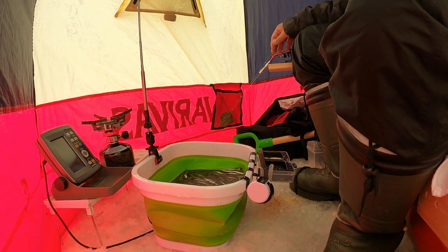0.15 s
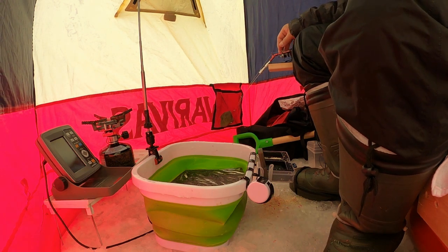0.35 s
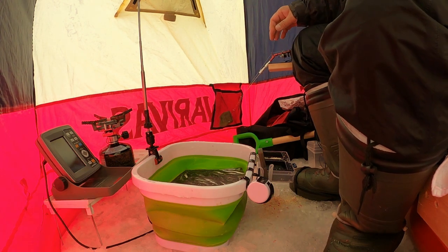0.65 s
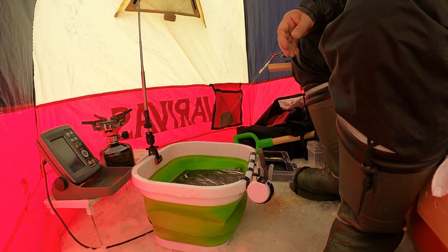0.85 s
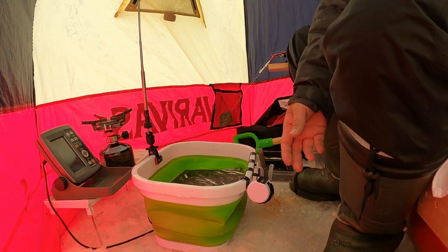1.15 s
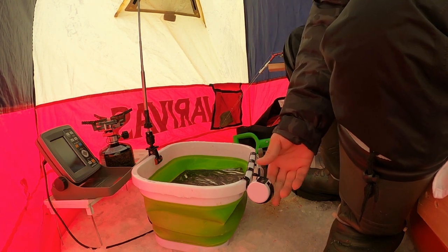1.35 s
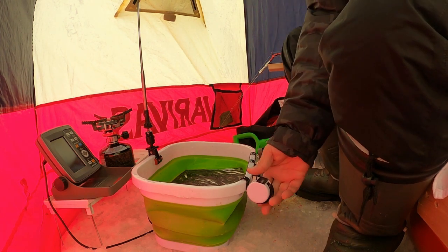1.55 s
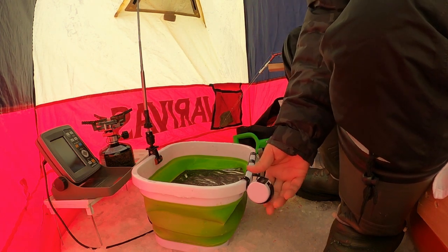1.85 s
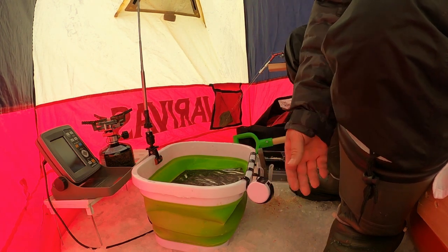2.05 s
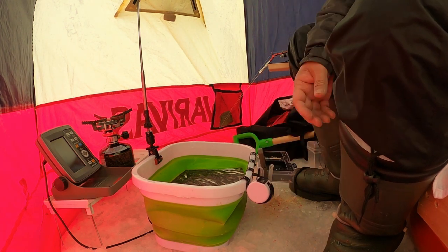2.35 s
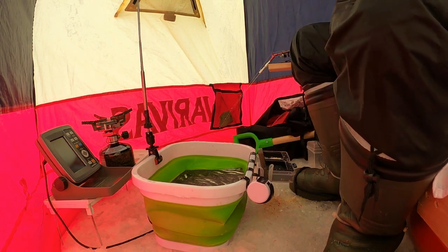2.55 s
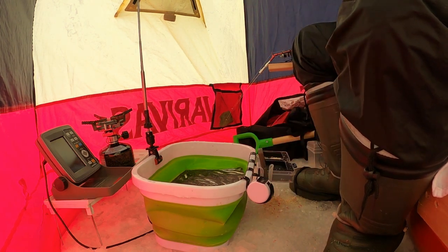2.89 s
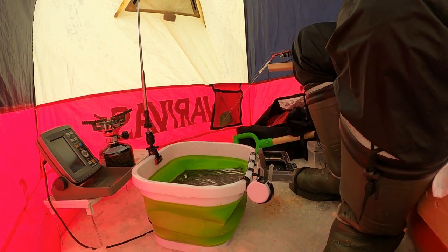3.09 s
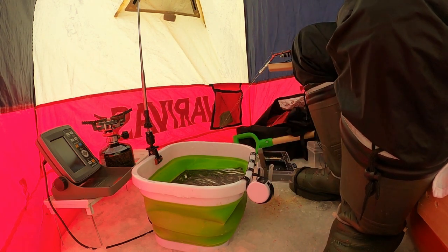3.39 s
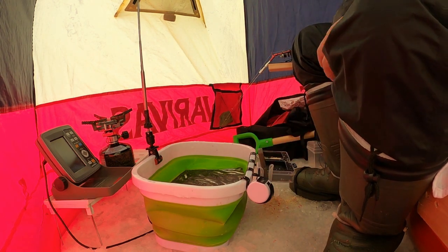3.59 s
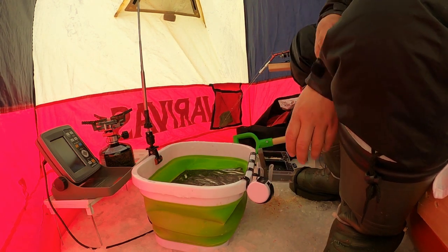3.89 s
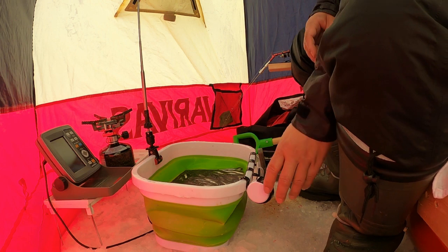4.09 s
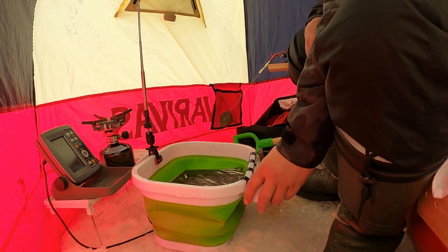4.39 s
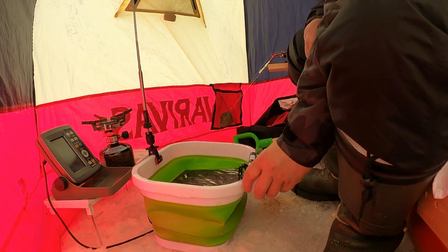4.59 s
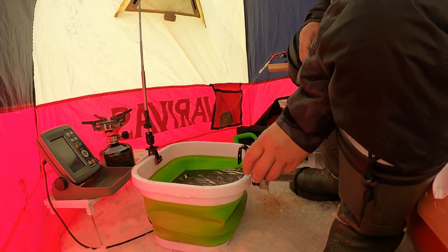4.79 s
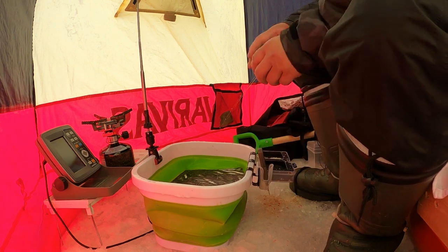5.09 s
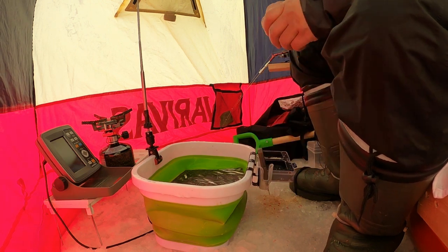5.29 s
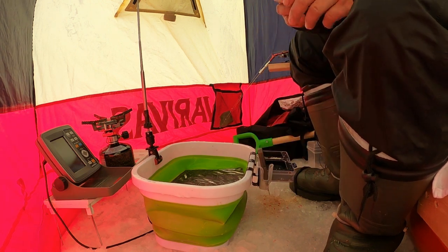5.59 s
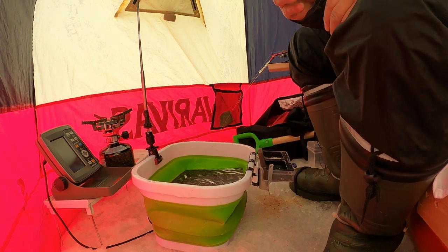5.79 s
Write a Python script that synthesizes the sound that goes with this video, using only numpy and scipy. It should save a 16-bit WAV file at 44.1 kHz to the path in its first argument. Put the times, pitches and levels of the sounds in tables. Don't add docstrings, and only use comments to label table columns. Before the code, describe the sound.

Nylon sleeves swish close by while a small reel stutters in two short bursts, with sharp plastic clicks and soft boot thuds inside a tent.

```python
import sys
import numpy as np
from scipy import signal
from scipy.fft import rfft, irfft
from scipy.io import wavfile
from scipy.ndimage import uniform_filter1d

SR = 44100
rng = np.random.default_rng(int(sys.argv[2]) if len(sys.argv) > 2 else 0)


def unload_audio(sound):
    columns = np.transpose(np.atleast_2d(sound))
    steps = np.round(np.clip(columns, -1, 1) * 32767)
    wavfile.write(sys.argv[1], SR, steps.astype(np.int16))


def field_ratio(decibels):
    return 10 ** (np.asarray(decibels, dtype=float) / 20)


N = 261954


def evened(x):
    return x / np.sqrt(np.mean(abs(x) ** 2) + 1e-20)


def read(points, hz):
    f, value = np.transpose(points)
    return np.interp(np.log(hz + 1), np.log(f + 1), value)


def add(mix, s, sound):
    part = mix[round(s * SR):][:len(sound)]
    part += sound[:len(part)]


def resonate(x, hz, width_hz):
    turn = np.exp(2j * np.pi * np.cumsum(hz * np.ones(len(x))) / SR)
    r = np.exp(-np.pi * width_hz / SR)
    smooth = signal.lfilter([1 - r], [1, -r], x / turn)
    return 2 * (turn * smooth).real


# (frequency [Hz], difference [dB])
BALANCE_DB = [(60, 1), (110, 1), (200, -0.5), (380, 0.0), (700, -2.5), (1290, 0.5), (2380, 2.5),
              (4400, 3.5), (8120, 3.5), (15000, -6)]
LAG_S = 5e-5


def ports(a, b, same, hz):
    c = np.clip(read(same, hz), 0, 1)
    side = field_ratio(read(BALANCE_DB, hz) / 2)
    left = a.T * side * np.exp(-2j * np.pi * hz * LAG_S)
    right = (c * a.T + np.sqrt(1 - c ** 2) * b.T) / side
    return np.array([left.T, right.T])


HOP = 128
HZ = np.fft.rfftfreq(4 * HOP, 1 / SR)


def band(shape, lo_hz, hi_hz):
    gain = field_ratio(read(shape, HZ))
    inside = (HZ >= lo_hz) & (HZ < hi_hz)
    return (gain / np.sqrt(np.sum(gain[inside] ** 2) / len(HZ)))[:, None]


def shaped(drive, gain, same):
    z = signal.stft(drive, nperseg=4 * HOP, noverlap=3 * HOP)[2]
    pair = ports(z[0] * gain, z[1] * gain, same, HZ)
    return signal.istft(pair, nperseg=4 * HOP, noverlap=3 * HOP)[1][:, :N]


# (frequency [Hz], density [dB per Hz])
AIR = [(12, -14), (20, -1), (44, -2), (103, -23), (169, -13), (460, -26), (780, -30), (1220, -22),
       (1650, -23), (2370, -43), (7590, -26), (9750, -38), (12200, -41), (13200, -41), (15200, -49)]
# (frequency [Hz], likeness [-])
AIR_SAME = [(60, 0.92), (180, -1.26), (550, -1.65), (1650, 0.87), (4970, -0.96), (15000, 0.28)]


def air(level_db=-67):
    return field_ratio(level_db) * shaped(rng.standard_normal((2, N)), band(AIR, 1000, 9000), AIR_SAME)


def hump(t, s, rise_s, fall_s, rise_shape, fall_shape):
    late = t - s[:, None]
    u = np.clip(np.where(late < 0, -late / rise_s[:, None], late / fall_s[:, None]), 0, 1)
    return abs(np.cos(np.pi * u / 2)) ** (2 * np.where(late < 0, rise_shape, fall_shape))


# (fastest moment [s], speed-up [s], slow-down [s], rubbing [dB], sheen [dB])
STROKES = [(.06, 0.21, 0.079, -50, 1.5), (.66, .14, 0.13, -65, -6), (.86, .14, 0.76, -42.5, 7),
           (1.2, .3, .42, -37.5, -.5), (1.57, 0.13, 0.088, -43, -5.5), (1.76, 0.28, 0.12, -49, -2),
           (1.93, 0.065, .11, -51, -9), (2.181, .21, 0.43, -42, -1.5), (2.6, 0.39, 0.32, -41, 2.5),
           (2.79, 0.21, .19, -47.5, -10), (3.07, .26, .24, -51.5, 1), (3.35, 0.18, 0.16, -52, 0),
           (3.6, 0.2, 0.27, -38.5, 1.5), (4.05, .42, 0.24, -35, 0), (4.26, 0.2, 0.26, -36.5, -3),
           (4.48, 0.17, 0.14, -41.5, -5.5), (4.65, 0.082, .22, -56.5, -2), (5.0, .19, .15, -41.5, -4),
           (5.11, .15, .25, -39, 2), (5.3, 0.2, 0.3, -45, 0), (5.64, 0.25, 0.21, -44, -2.5),
           (5.81, 0.14, 0.11, -43, 0), (5.95, 0.085, .1, -50.5, 0)]
# (time [s], length [s], folds [dB], sway [dB])
SHIFTS = [(.88, 0.096, -67, -57), (1.1, .13, -56, -56), (1.23, .17, -50, -45), (1.357, 0.18, -55, -51),
          (1.51, .18, -60, -46), (1.864, 0.084, -63, -55.5), (2.647, .2, -56, -57), (2.873, 0.29, -59, -53),
          (3.21, .2, -69, -65), (3.585, 0.23, -53.5, -65), (3.82, 0.23, -49.5, -55.5),
          (3.94, 0.22, -49.5, -60), (4.117, 0.26, -49, -49), (4.346, 0.37, -56, -60),
          (5.034, 0.18, -54, -57), (5.29, 0.27, -56, -56), (5.41, .12, -55, -60), (4.67, .14, -62, -62),
          (5.62, 0.11, -64.5, -59.5), (5.84, 0.22, -55, -67), (5.905, .1, -55, -52)]
RISE_SHAPE, FALL_SHAPE = 1.234, 1.08
REST_DB, REST_SHEEN_DB = -72.5, 10.5
SHEEN_PER_DB = 0.06
FOLDS_DB, FOLDS_PER_DB = -63, 0.9
SWAY_DB, SWAY_PER_DB = -64.5, 0.13


def motion(t):
    s, rise_s, fall_s, db, sheen_db = np.transpose(STROKES)
    each = hump(t, s, rise_s, fall_s, RISE_SHAPE, FALL_SHAPE) * field_ratio(2 * db)[:, None]
    rest = field_ratio(2 * REST_DB)
    power = each.sum(0) + rest
    rub_db = 10 * np.log10(power)
    lead_db = rub_db + 42
    bright_db = (sheen_db @ each + REST_SHEEN_DB * rest) / power + SHEEN_PER_DB * lead_db
    s, length, folds_db, sway_db = np.transpose(SHIFTS)
    shift = hump(t, s, length / 2, length / 2, 1, 1)
    folds = np.sqrt(field_ratio(2 * folds_db) @ shift + field_ratio(2 * (FOLDS_DB + FOLDS_PER_DB * lead_db)))
    sway = np.sqrt(field_ratio(2 * sway_db) @ shift + field_ratio(2 * (SWAY_DB + SWAY_PER_DB * lead_db)))
    return rub_db, bright_db, folds, sway


# (frequency [Hz], density [dB per Hz])
NYLON = [(410, -72), (700, -67), (840, -13.5), (1060, -2.5), (1590, -4), (2200, -3), (2800, -2.5),
         (4870, -5.5), (7540, -7), (8800, -12.5), (10400, -22.5), (12300, -23.5), (13200, -32.5),
         (15200, -37), (15700, -60)]
# (frequency [Hz], density [dB per Hz])
FOLDS = [(150, -39), (280, 1.5), (500, 3.5), (650, 2.5), (800, -8.5), (1000, -24)]
# (frequency [Hz], density [dB per Hz])
SWAY = [(20, -65), (50, 16), (100, -1), (170, 11), (250, -2.5), (400, -61)]
# (frequency [Hz], likeness [-])
SAME = [(60, 1), (300, 0.91), (700, 0.75), (1400, 0.8), (3000, 0.62), (6000, 0.28), (12000, 0.11)]


def sleeves(grain_db=1.5, catch_db=0.64, ridge_db=1.7, crease_db=3):
    slips = field_ratio(grain_db * np.minimum(rng.exponential(1, N), 4)) * rng.standard_normal((2, N))
    catch = evened(uniform_filter1d(uniform_filter1d(rng.standard_normal(N), size=150), size=150))
    drive = evened(slips * field_ratio(catch_db * catch))
    t = np.arange(-(-N // HOP) + 1) * HOP / SR
    rub_db, bright_db, folds, sway = motion(t)
    ridges, creases = rng.standard_normal((len(t), len(HZ), 2)).T
    ridges = evened(uniform_filter1d(uniform_filter1d(ridges, size=40, axis=1), size=3, axis=0))
    creases = evened(uniform_filter1d(uniform_filter1d(creases, size=6, axis=1), size=6, axis=0))
    tilt = np.log2(np.clip(HZ, 700, 9000) / 2200)[:, None] / 2.0
    weave_db = rub_db + tilt * np.clip(bright_db, -12, 12) + ridge_db * ridges
    weave = band(NYLON, 1000, 5000) * field_ratio(weave_db)
    low = band(FOLDS, 300, 800) * folds + band(SWAY, 60, 280) * sway
    return shaped(drive, weave + low * field_ratio(crease_db * creases), SAME)


# (frequency [Hz], level [dB], t60 [s])
RIM = [(455, -2, 0.014), (724, 8, 0.012), (1154, 0, 0.024), (1770, 0, .012)]
# (frequency [Hz], level [dB], t60 [s])
LATCH = [(990, -.5, .04), (1300, -7, .03), (1650, -8, .02), (2050, -6, 0.02), (2690, -14, .025),
         (3400, -9, .025), (4000, -11, .02), (4716, -6, .025), (6955, -11, .03)]
# (frequency [Hz], level [dB], t60 [s])
CLAMP = [(1030, -3, 0.03), (3110, -10, 0.025), (4000, -3, 0.024), (4300, -4, .022), (4760, -2, .025),
         (5050, -3, 0.025), (7000, -14, .025)]
# (frequency [Hz], level [dB], t60 [s])
HOOK = [(955, 0, .03), (1400, -6, .02), (2665, -4, .022), (3350, 0.5, .022), (4800, -11, .025),
        (5730, -14, .02)]
# (part, time [s], level [dB], pitch ratio [-])
BLOWS = [
    (RIM, .546, -33.5, 1.005),
    (RIM, 3.281, -37, 1),
    (LATCH, 1.7905, -16.5, 1.0),
    (HOOK, 5.8775, -26, 1.0),
    (CLAMP, 1.942, -27, 1.0),
    (CLAMP, 1.9475, -33, 1.0),
    (CLAMP, 4.715, -27.5, 1.02),
    (HOOK, 5.8815, -29, 1.0),
]
# (time [s], frequency [Hz], level [dB], t60 [s])
TICKS = [(.536, 7150, -47, .02), (1.909, 960, -40, .063), (1.97, 970, -43, .034), (4.038, 1035, -35, .026),
         (4.586, 1870, -33.5, 0.01), (4.661, 3250, -44, .02), (4.671, 3200, -36, .025),
         (4.686, 2140, -37, 0.02), (4.695, 1690, -36, .022), (4.684, 3250, -43, .04),
         (4.695, 3150, -39, .03), (4.676, 1200, -44, .05), (4.703, 1200, -40, .04),
         (4.7015, 3130, -27, 0.015), (4.7015, 2250, -36, .02), (4.704, 298, -38.5, 0.017),
         (4.715, 2220, -24.5, .027), (4.715, 2600, -31, .012), (4.715, 4150, -32, .03),
         (4.715, 950, -34, .03), (4.715, 2900, -30, .01), (4.723, 5250, -37, .02), (4.732, 7100, -42, .02),
         (4.732, 2250, -42, .02), (5.878, 414, -38, .04), (4.93, 1000, -29, 0.013), (4.984, 1300, -33, .02),
         (5.078, 1035, -31, .05), (5.302, 570, -34, 0.015), (5.311, 1000, -36, .02),
         (5.228, 1300, -33, .02), (5.37, 1850, -31, 0.02), (5.407, 1900, -29, .02),
         (5.406, 4030, -34, 0.017), (5.765, 446, -34, .02), (5.7795, 2000, -28, 0.005),
         (5.7795, 1200, -28, .006), (3.281, 1165, -47, .03), (1.335, 2230, -36, .04)]


def rings(rise=0.075, rattle=0.35):
    t, out = np.arange(4096) / SR, np.zeros(N)
    struck = list(TICKS)
    for part, s, db, ratio in BLOWS:
        struck += [(s, hz * ratio, db + mode_db, t60) for hz, mode_db, t60 in part]
    noises = rng.standard_normal((len(struck), len(t), 2)) @ [1, 1j]
    for (s, hz, db, t60), noise in zip(struck, noises):
        bounces = 1 + rattle * evened(uniform_filter1d(noise, size=int(6 * SR / hz ** .75 / 8)))
        swell = field_ratio(db + 5.2 - 60 * t / t60) * (1 - np.exp(-t / (rise * t60)))
        add(out, s, swell * (bounces * np.exp(2j * np.pi * hz * t)).imag)
    return out


# (time [s], level [dB], frequency [Hz], t60 [s])
THUDS = [(0.544, -43, 200, 0.07), (0.823, -47.5, 153, 0.61), (2.182, -39.5, 168, 0.051),
         (2.208, -41.5, 162, 0.12), (2.559, -41, 125, 0.1), (3.282, -38.5, 168, 0.15),
         (3.691, -40.5, 156, 0.15), (4.106, -39, 168, 0.18), (4.19, -38, 154.2, 0.33),
         (4.393, -46, 151, 0.29), (4.533, -34, 202, 0.042), (5.024, -43.5, 184, 0.14),
         (5.764, -45, 455, 0.11), (5.898, -45, 188, 0.15)]


def thuds():
    t, out = np.arange(12000) / SR, np.zeros(N)
    for s, db, hz, t60 in THUDS:
        decay = field_ratio(db + 2.0 - 60 * t / max(t60, .02))
        add(out, s, decay * np.sin(2 * np.pi * hz * t) * np.minimum(t / 0.0029, 1))
    return out


# (frequency [Hz], density [dB per Hz])
CRACK = [(350, -80), (600, -45), (969, -1.5), (1520, -12), (2200, -12.5), (2490, -11.5), (4800, -11),
         (5660, -10.5), (8000, -16), (10200, -15), (12500, -25), (14500, -42), (15800, -65)]
# (time [s], level [dB], brightness [dB per octave], t60 [s])
CRACKS = [(0.5451, -39, -6.5, 0.038), (0.738, -46, -7, 0.018), (1.7893, -21, 4.5, 0.035),
          (1.8405, -41, -3, 0.08), (1.8916, -40, -3, 0.035), (1.9083, -33.5, 0.5, 0.026),
          (1.9415, -27, 2.5, 0.035), (3.2802, -42, -16, 0.03), (3.5838, -33, -3.5, 0.017),
          (3.7857, -26.5, -3.5, 0.021), (4.039, -24, -0.5, 0.026), (4.119, -26, -3, 0.016),
          (4.3503, -29.5, -6, 0.022), (4.685, -42, -3, 0.03), (4.7009, -38, -4.5, 0.035),
          (4.7146, -26.5, 0, 0.04), (4.9294, -38, -8, 0.015), (5.3543, -36.5, -4, 0.017),
          (5.371, -31, -7, 0.023), (5.4051, -31, -5, 0.022), (4.6685, -44, 1, 0.04),
          (5.7794, -25, -7, 0.009), (5.8132, -36, -1, 0.017), (5.872, -32, 0.5, 0.022),
          (5.8768, -28, -1, 0.035)]


def cracks():
    t, hz, out = np.arange(4096) / SR, np.fft.rfftfreq(4096, 1 / SR), np.zeros(N)
    for (s, db, bright_db, t60), noise in zip(CRACKS, rng.standard_normal((len(CRACKS), len(t)))):
        colour_db = read(CRACK, hz) + bright_db * np.log2(hz / 3000 + 0.11)
        rattle = evened(irfft(rfft(noise) * field_ratio(colour_db)))
        decay = field_ratio(db + 2.6 - 60 * t / max(t60, .003))
        add(out, s, decay * rattle * np.minimum(t / 0.0013, 1))
    return out


# (time [s], frequency [Hz], level [dB])
WHISTLES = [
    [(.56, 1330, -61), (.62, 1290, -62), (.68, 1260, -61), (.75, 1250, -62), (.86, 1280, -60)],
    [(.875, 1450, -52), (.90, 1470, -48), (.93, 1600, -47), (.955, 1690, -45), (.975, 1800, -54),
     (1.02, 2150, -50)],
    [(2.02, 2240, -54), (2.1, 2230, -53), (2.25, 2230, -51), (2.4, 2200, -52), (2.55, 2230, -54)],
]
# (first width [Hz], second width [Hz], third width [Hz])
FUZZ_HZ = [(70, 10, 90)]


def whistles(steady=(.3, 3, .3)):
    out = np.zeros(N)
    for rows, fuzz_hz, share in zip(WHISTLES, *FUZZ_HZ, steady):
        s, hz, db = np.transpose(rows)
        t = np.arange(s[0], s[-1], 1 / SR)
        pitch_hz = np.interp(t, s, hz)
        noise = rng.standard_normal(SR)[:len(t)]
        fuzz = evened(resonate(noise, pitch_hz, np.clip(fuzz_hz, 10, 400)))
        line = fuzz + share * np.sin(2 * np.pi * np.cumsum(pitch_hz) / SR)
        add(out, s[0], field_ratio(np.interp(t, s, db)) * evened(line) * signal.windows.tukey(len(t), .3))
    return out


# (frequency [Hz], width [Hz], level [dB])
REEL = [(60, 27, -19), (110, 40, -7), (181, 18, -7), (290, 29, -11), (410, 45, -9), (570, 55, -2.5),
        (915, 70, -1.5), (1116, 120, -7), (1230, 160, -2.5), (1500, 290, -6), (1880, 130, -5),
        (2230, 150, -10), (2780, 240, -6), (3200, 200, -9), (3600, 250, -12), (4100, 350, -13.5),
        (4700, 340, -4), (5560, 270, -21)]
# (time [s], knock [dB], bright edge [dB])
FIRST_RUN = [(1.1594, -28.5, -12), (1.1754, -30, -3), (1.19, -26, -6), (1.2101, -23, -6),
             (1.2245, -24.5, -4), (1.2405, -24, -8), (1.2583, -25, -5), (1.2767, -24, -7),
             (1.2976, -23.5, -6), (1.32, -22.5, -7), (1.3529, -24.5, -6), (1.3889, -23, -5),
             (1.4298, -22, -4), (1.4678, -22.5, -4), (1.5075, -23.5, -4), (1.5285, -23.5, -6),
             (1.5426, -25.5, -5), (1.5617, -29, -2), (1.5793, -28, -4), (1.6087, -26, -2)]
# (time [s], knock [dB], bright edge [dB])
SECOND_RUN = [(2.6334, -29.5, -4), (2.6585, -30, -2), (2.68, -31, -3), (2.7025, -29, -3),
              (2.7237, -31.5, -3.5), (2.7458, -31, -5), (2.7729, -33.5, -4), (2.7994, -30.5, -4),
              (2.819, -33, -2), (2.833, -35, 0), (2.849, -35.5, -2), (2.867, -36.5, -2), (2.892, -33, 0.5)]
# (first run [dB], second run [dB])
RUN_TOP_DB = [(4, -5)]
RUN_LOW_DB, LOW_PER_DB = (-24, -32), 0.77
CHATTER_HZ, CHATTER_FIRST_DB, CHATTER_FADE_DB = 928, -1.5, -3.5


def reel(variety=0.08):
    t, k = np.arange(400) / SR, np.arange(6)
    out = np.zeros((4, N))
    bounce = field_ratio(CHATTER_FIRST_DB * (k == 0) + CHATTER_FADE_DB * k)
    chatter = bounce @ np.sinc((t - k[:, None] / CHATTER_HZ) * SR - 4) / bounce.sum()
    runs = zip((FIRST_RUN, SECOND_RUN), RUN_LOW_DB, *RUN_TOP_DB)
    slips = [(*row, low_db, top_db) for run, low_db, top_db in runs for row in run]
    noises = rng.standard_normal((len(slips), len(t)))
    for (s, db, bright_db, run_db, top_db), noise in zip(slips, noises):
        grit = variety * noise * field_ratio(-60 * t / .012)
        push = 8 * ((t == 0) + grit) * field_ratio(db)
        buzz = 16 * (chatter + grit / 2) * field_ratio(db)
        low_db = (1 - LOW_PER_DB) * (run_db - db)
        shares_db = (low_db, 0, bright_db, bright_db + top_db)
        for row, drive, share_db in zip(out, (push, buzz, buzz, push), shares_db):
            add(row, s, drive * field_ratio(share_db))
    total = np.zeros(N)
    for i, (hz, width_hz, db) in enumerate(REEL):
        drive = out[(hz > 700) + (hz > 1600) + (hz > 3800)]
        total += (-1) ** i * field_ratio(db) * resonate(drive, hz, width_hz) * np.sqrt(120 / width_hz)
    return field_ratio(19) * total


# (frequency [Hz], t60 [s])
TENT = [(150, 0.24), (500, 0.045), (1000, 0.047), (3000, 0.055), (10000, 0.071)]
ICE_DIP_HZ, ICE_DIP_DB = (655, 885), -14


def tent(x, wet_db=-8):
    taps = np.zeros((2, 8192))
    slots = np.arange(40, 8160, 24)
    at = slots + rng.integers(0, 24, (2, len(slots)))
    np.put_along_axis(taps, at, rng.choice([-1., 1.], at.shape), 1)
    hz, t, z = signal.stft(taps, SR, nperseg=128)
    fade = field_ratio(-60 * t / read(TENT, hz)[:, None])
    tail = signal.istft(z * fade, SR, nperseg=128)[1][:, :8192]
    tail = rfft(field_ratio(wet_db) * tail / np.linalg.norm(tail[0]), 16384)
    hz = np.fft.rfftfreq(16384, 1 / SR)
    direct = ports(hz ** 0, hz ** 0 * 0, [(1, 1), (2, 1)], hz)
    both = ports(tail[0], tail[1], SAME, hz) + direct
    dip = signal.cheby2(2, -ICE_DIP_DB, ICE_DIP_HZ, "bandstop", fs=SR, output="sos")
    both *= signal.sosfreqz(dip, hz, fs=SR)[1]
    response = np.roll(irfft(both), 64, axis=1)
    return signal.fftconvolve(x[None], response, axes=1)[:, 64:N + 64] / np.linalg.norm(response[0])


def scene():
    return air() + sleeves() + tent(rings() + thuds() + cracks() + whistles() + reel())


def top_cut(x):
    return signal.sosfilt(signal.butter(12, 16110, fs=SR, output="sos"), x)


def record(dry):
    edge = signal.firwin(255, 15150, window=("kaiser", 9), fs=SR)
    mix = signal.oaconvolve(dry, edge[None], "same")
    return top_cut(mix)


dry = scene()
out = record(dry)
unload_audio(out)
```